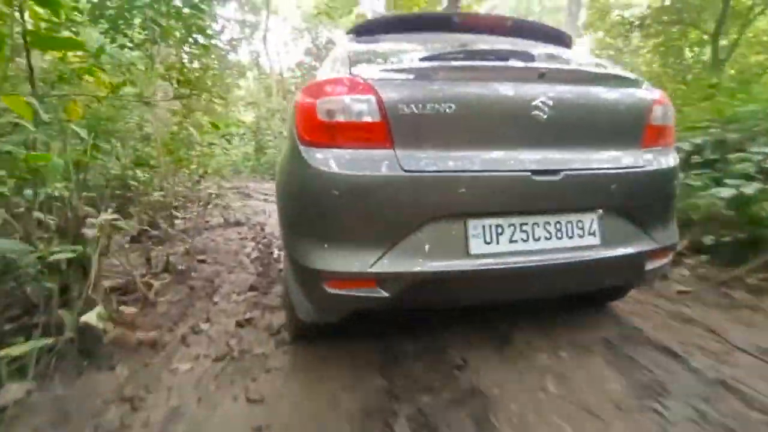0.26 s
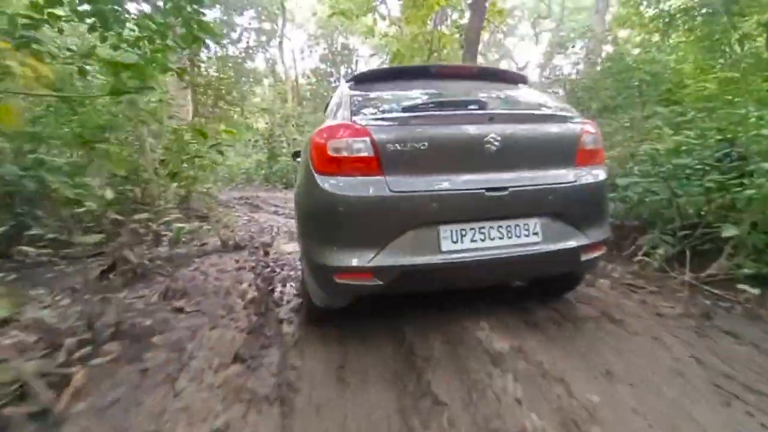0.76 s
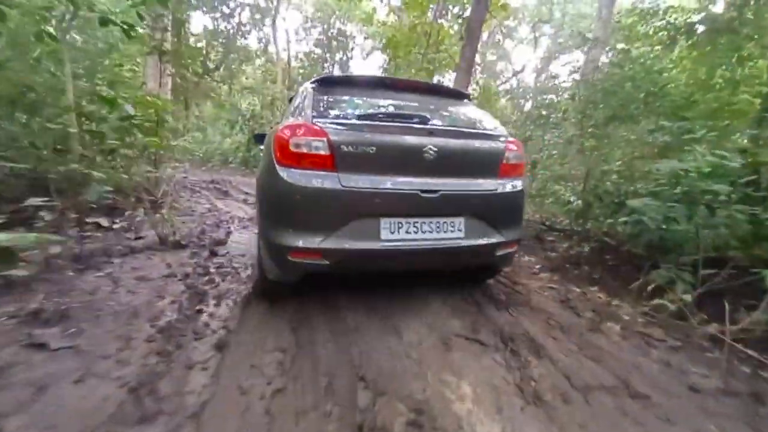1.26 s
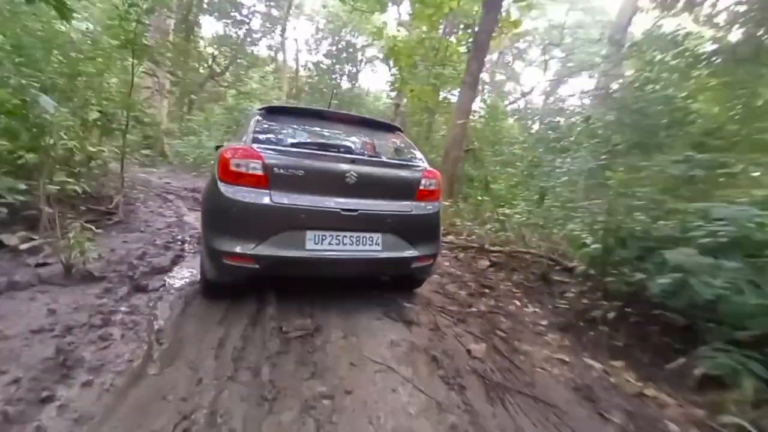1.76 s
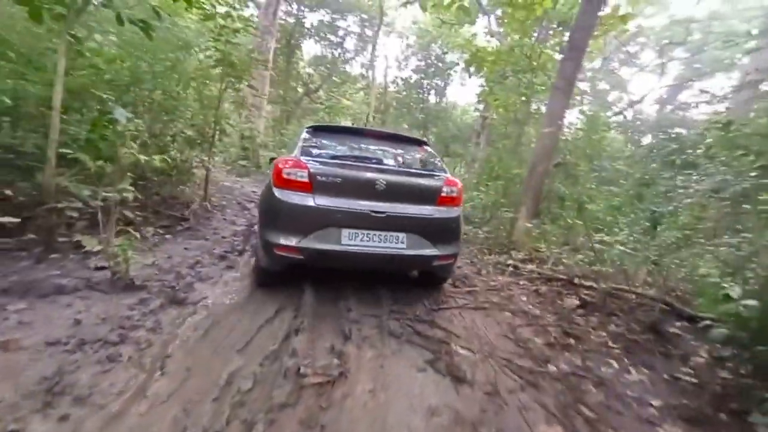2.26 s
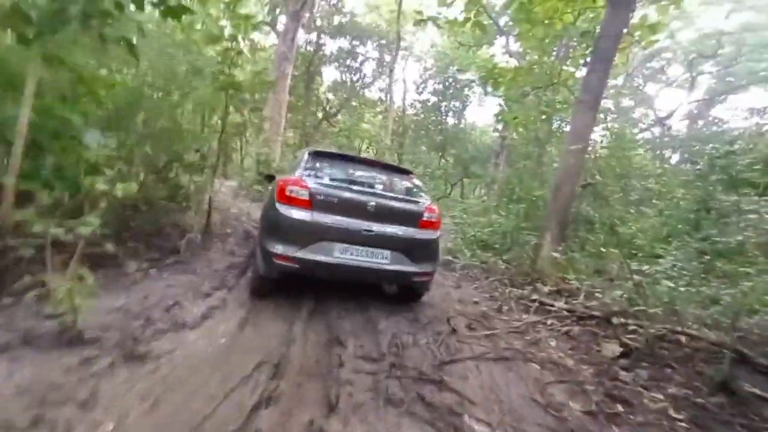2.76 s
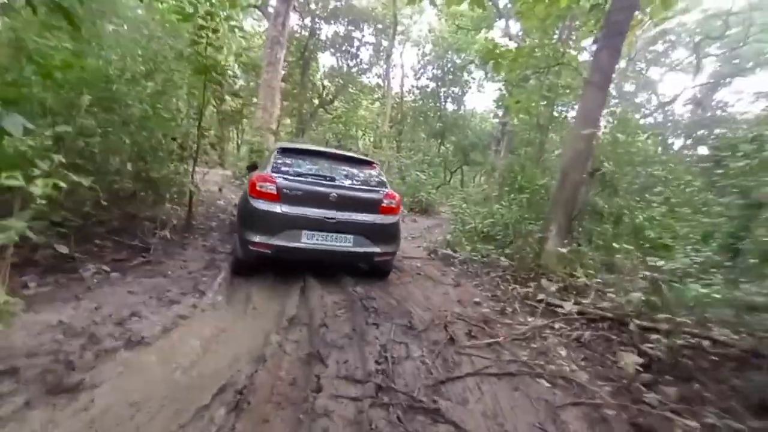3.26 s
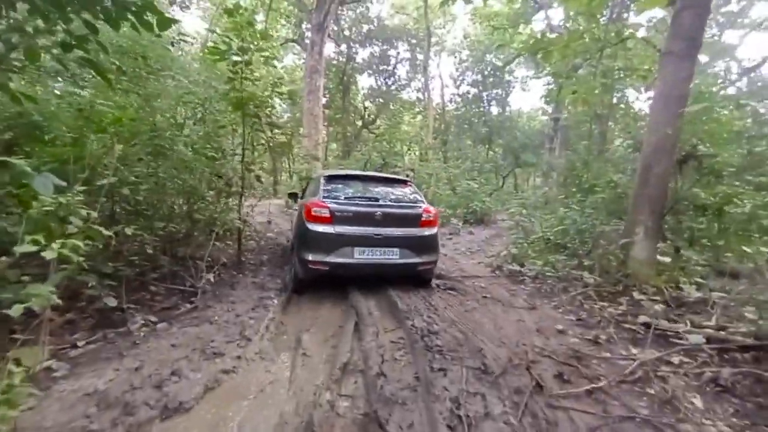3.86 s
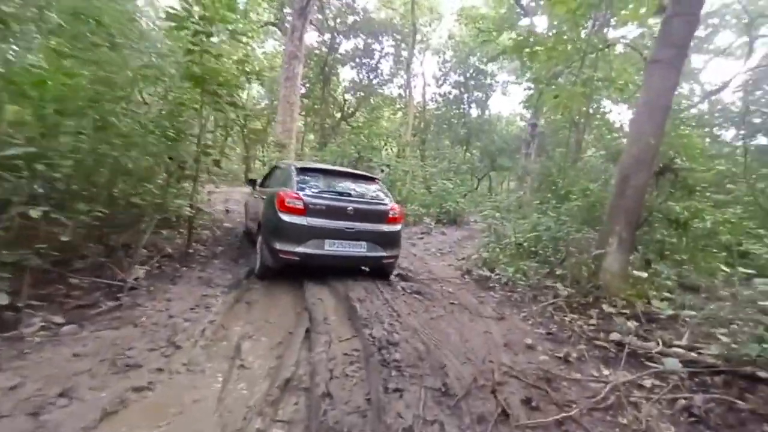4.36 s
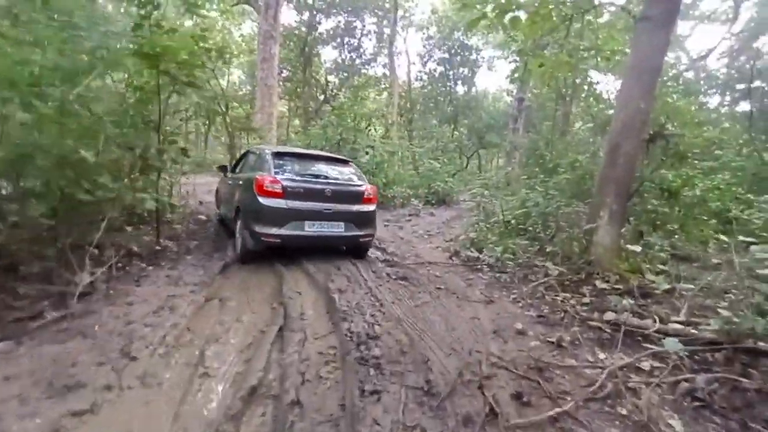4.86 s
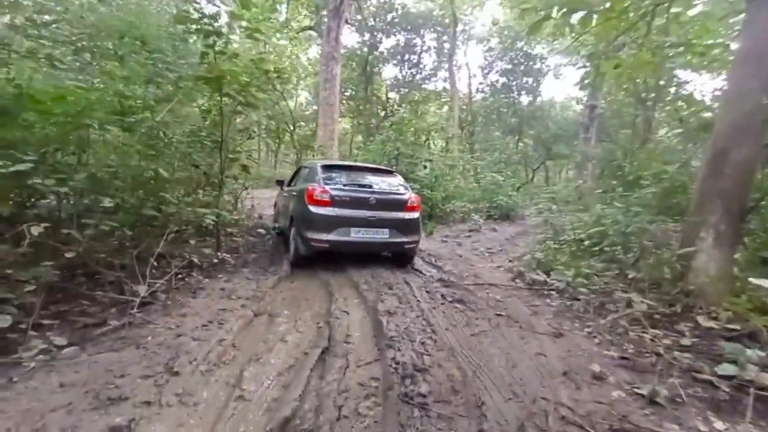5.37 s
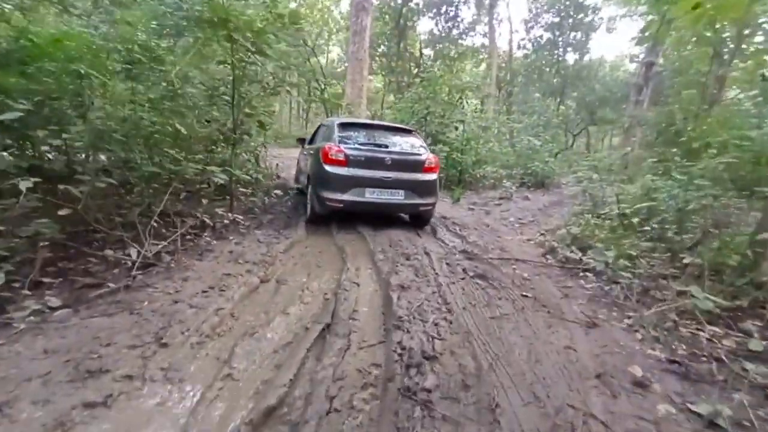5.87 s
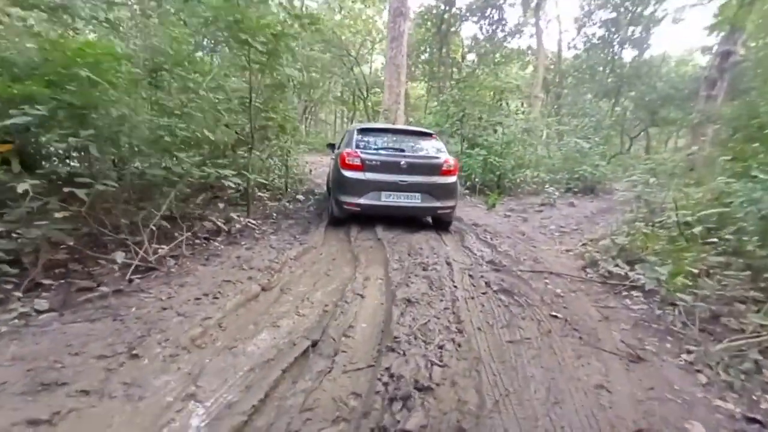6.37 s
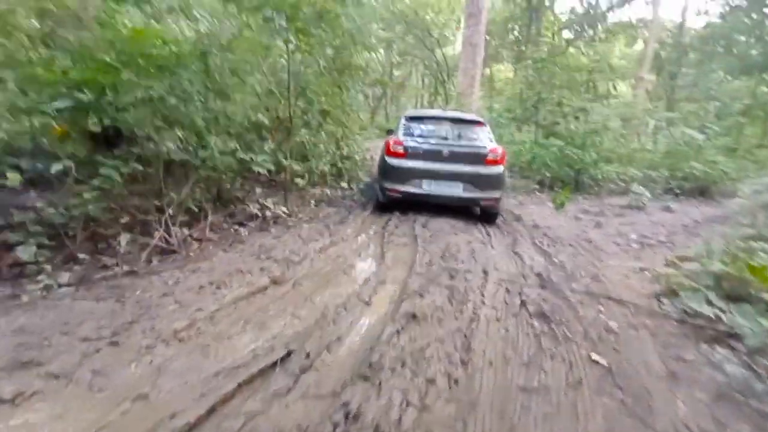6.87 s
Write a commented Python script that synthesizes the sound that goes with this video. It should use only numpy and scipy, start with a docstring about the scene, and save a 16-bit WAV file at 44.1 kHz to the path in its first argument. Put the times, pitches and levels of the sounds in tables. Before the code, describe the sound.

A car works slowly through forest mud. Its low, throaty exhaust is strongest at first with a faint rough whine, then drops back with brief revs around two seconds. Wet tyre crackle, small bubbly squelches, wheel knocks and dry twig snaps run through the scene before a sparse lull. Finally, the revs climb and close branches break and scrape in loud, ringing volleys. The open-air microphone also catches soft background hum and steady high hiss.

```python
"""A muddy forest track: a faint low background and a high hiss lie behind a small car from the first moment.
Its engine, a sum of crank orders and gas puffs through pipe resonances, swells with each push of throttle;
a rough whine comes and goes, and the tyres hiss and crackle through wet mud in clouds of clicks and bubbles.
Twigs ping, wheels knock in ruts, air pockets squelch and sticks crunch in ringing volleys.
Near the end sticks break loudly, as if close by, and scrape; the trees scatter the ground sounds back."""
import sys
import numpy as np
from scipy import signal
from scipy.fft import rfft, irfft
from scipy.io import wavfile
from scipy.ndimage import uniform_filter1d

SR = 44100
rng = np.random.default_rng(int(sys.argv[2]) if len(sys.argv) > 2 else 0)


def unload_audio(sound):
    """Save the sound as a 16-bit wav file, at the path given as the first command line argument."""
    columns = np.transpose(np.atleast_2d(sound))
    # keep every value between -1 and 1, then stretch to whole-number steps
    steps = np.round(np.clip(columns, -1, 1) * 32767)
    wavfile.write(sys.argv[1], SR, steps.astype(np.int16))


N = 313551
T = np.arange(N) / SR

# Spectrum levels are relative: each coloured sound is scaled to rms 1 before its own level is applied.
# faint background, strongest near 200 Hz: frequency_hz, level_db
BACKGROUND_SPECTRUM = [(25, -8), (70, 1.5), (200, 9.5), (350, -11.5), (1000, -3), (3000, -35), (15000, -45)]
# high hiss from the undergrowth: frequency_hz, level_db
HISS_SPECTRUM = [(2000, -18), (3200, -25), (3800, 1.5), (4600, 0.5), (5400, 1.5), (5900, 6), (6400, -2.5),
                 (8200, -3.5), (10000, -9), (15500, -8)]
HISS_DB = -44.5

# crankshaft speed before its small waver: time_s, speed_hz (turns a second)
CRANK_SPEED = [(0, 36.64), (.1, 35.98), (.25, 39.7), (.48, 39.95), (.92, 31.8), (1.1, 32.8), (1.3, 32.83),
               (1.8, 27.37), (2, 31.68), (2.16, 39.73), (2.33, 44.3), (2.47, 38.8), (2.7, 33.3),
               (4.55, 26.96), (4.95, 34.14), (5.55, 32.2), (5.7, 33.65), (5.93, 31.97), (6.05, 34.14),
               (6.17, 40.17), (6.42, 53.2), (6.53, 56.47), (6.74, 56.8), (6.9, 43.56), (7.11, 35.45)]
# pushes on the throttle, levels at CRUISE_HZ: start_s, length_s, note_db (firing note),
# throat_db (throaty pipe sound), third_over_note_db (third crank order), drone_db (clean pipe drone)
THROTTLE_PUSHES = [(0, 0.11, -34.5, -32, -5.5, -37), (0.166, 0.14, -39, -34, 0, -39),
                   (0.294, 0.094, -49, -36, -4, -28), (.42, 0.053, -56, -38.5, -12, -60),
                   (0.6, 0.025, -53, -49, -4, -35), (0.938, 0.2, -47.5, -51, -9, -58),
                   (1.988, 0.14, -38.5, -49, -7.5, -59), (2.137, 0.083, -41, -41.5, -1, -36.5),
                   (2.29, .08, -60, -47.5, -5, -60), (2.458, 0.16, -47.5, -48.5, -5, -46),
                   (4.738, 0.21, -43, -52, -7.5, -57), (5.579, .21, -43, -51.5, -7, -53),
                   (5.838, 0.214, -39, -47, -11, -49), (6.109, 0.1, -42, -49.5, -2.5, -38),
                   (6.35, .14, -44.5, -43.5, -2, -41), (6.53, 0.26, -43, -41, 5, -33.5),
                   (6.798, 0.11, -48, -39, 3.5, -36), (7, .15, -55, -35, 4, -34.5)]
# exhaust pipe resonances: pitch_hz, width_hz, level_db (at zero load_db and CRUISE_HZ),
# bite_db_per_db (gain for each dB of load), rev_db_per_octave (gain with engine speed)
PIPE_RESONANCES = [(176, 9.5, -6.5, 0, -3), (201.4, 15.4, -5, 0, 0.5), (253.3, 11.6, -13.5, 0.53, 21.5),
                   (428.2, 36, -0.5, 0.43, -10.5), (575, 110, -23, -0.4, -11)]
# spectrum of the shaking car body: frequency_hz, level_db
BODY_RUMBLE = [(40, -12), (90, -4), (140, -7), (175, -1), (240, -19), (300, -21), (600, -30), (2000, -62)]
CRUISE_HZ = 35  # crank speed at which the speed-dependent gains are zero
IDLE_NOTE_DB, IDLE_THROAT_DB, IDLE_DRONE_DB = -73, -61, -60.5  # floors between pushes
REV_RISE_DB_PER_S, NOTE_FALL_DB_PER_S, THROAT_FALL_DB_PER_S = 137, 108, 167
NOTE_DB_PER_OCTAVE, THROAT_DB_PER_OCTAVE = 5, 17.5  # gain with engine speed
BOOM_HZ, BOOM_WIDTH_HZ, BOOM_DB = 112.6, 31, 7.5  # silencer lift on the second and third orders
DRONE_HZ, DRONE_WIDTH_HZ, DRONE_SWELL_DB_PER_S = 201.5, 41, 328
GAS_SHARE = .3  # gas puffs relative to the firing pulses
RUMBLE_DB = -10  # relative to the throaty sound

# faint rough whine that comes and goes: start_s, length_s, level_db
WHINE_SPELLS = [(0, 0.61, -46), (5.18, 0.09, -56.5), (6.2, 0.16, -58)]
WHINE_HZ, WHINE_FADE_DB_PER_S = 1274, 160

# how hard the tyres work the mud: time_s, churn_db (reference for the crackle, spray and random bursts)
TYRE_CHURN = [(0, -37.5), (.55, -37.5), (.68, -41), (.83, -39.5), (.91, -33), (1.1, -36), (1.22, -36),
              (1.3, -31.5), (1.41, -37), (1.56, -40.5), (1.85, -42.5), (1.97, -39), (2.25, -39),
              (2.5, -36.5), (2.66, -34), (2.86, -41), (3.08, -38), (3.3, -39), (3.8, -43.5), (4.15, -37),
              (4.45, -46), (4.6, -40.5), (4.87, -43), (4.97, -47.5), (5.18, -51.5), (5.26, -58),
              (5.38, -51), (5.45, -63), (5.8, -56), (5.88, -55), (6.08, -60.5), (6.38, -55), (6.5, -36.5),
              (6.65, -40), (6.75, -40), (6.88, -43), (6.97, -32), (7.11, -34)]
# a tyre wades through a wet patch: start_s, length_s, slosh_db
WET_PATCHES = [(0, 0.85, -43), (.89, 0.52, -35.5), (2.02, 0.54, -45.5), (2.48, 0.35, -35),
               (2.85, 0.46, -41.5), (3.75, 0.23, -43.5), (4.04, 0.29, -37.5), (4.55, 0.32, -44),
               (6.46, 0.11, -32.5), (6.7, 0.19, -33), (7.01, 0.056, -27.5)]
# watery slosh: frequency_hz, level_db
SLOSH_SPECTRUM = [(150, -42), (350, -21), (600, -3), (850, -14), (1150, 9), (1700, 11), (2300, 6.5),
                  (3500, 2)]
# sticky crackle: frequency_hz, level_db
CRACKLE_SPECTRUM = [(900, -13.5), (1800, -6), (2500, 3), (3200, 4.5), (3900, 6), (4500, 4.5), (5200, -17.5),
                    (7000, -5), (10000, -11.5)]
# fine spray: frequency_hz, level_db
SPRAY_SPECTRUM = [(2200, -57), (3200, -14), (4000, -8), (5200, 4), (5900, 5), (6500, -2), (8000, 0.5),
                  (10000, -9), (15500, -5.5)]
CRACKLE_DB, SPRAY_DB, DAMP_SLOSH_DB = 3, -1.5, -9.5  # relative to the churn
SLOSH_RISE_DB_PER_S, SLOSH_FALL_DB_PER_S = 446, 137

# loudest twigs snapping: start_s, ping_db, pitch_hz, tick_db (bright tick relative to the ping)
LOUD_SNAPS = [(.0662, -18, 2740, -14), (0.562, -10.5, 2270, -10), (0.722, -17, 3800, -4),
              (1.013, -14, 3430, 0), (1.0412, -27, 3700, -12), (1.228, -19.5, 2290, -12),
              (1.246, -9.5, 3500, -0.5), (1.336, -12, 5470, -18), (1.414, -15.5, 4600, -12),
              (1.4276, -16.5, 3620, -3), (1.5928, -19, 4130, -14), (1.601, -15, 3530, -8),
              (1.6815, -14, 3700, -4), (1.6862, -11.5, 2860, -5), (1.6946, -12, 3870, -7),
              (1.8143, -14.5, 3730, -17), (1.8784, -16.5, 2800, -2), (1.8858, -9.5, 4300, -7),
              (1.937, -18, 4320, 0), (1.9674, -19, 4204, -5), (2.017, -15.5, 3460, -0.5),
              (2.0742, -12.5, 4050, -10), (2.1208, -17, 4180, -6), (2.282, -20, 3840, -14),
              (2.326, -16.5, 3870, -4), (2.4037, -19.5, 2710, -17), (2.5318, -16, 3430, -15),
              (2.6023, -12.5, 5370, -17), (2.876, -17.5, 3540, -12), (2.9465, -19, 3700, -5),
              (2.97, -16.5, 3490, -12), (3.19, -16, 4300, -19), (3.206, -18, 3710, -21),
              (3.314, -19.5, 2350, -16), (3.3784, -17, 3970, -7), (3.391, -12.5, 4300, -12),
              (3.4061, -13.5, 4030, -18), (3.505, -24, 4610, 9), (3.511, -19, 5700, -2),
              (3.6068, -13.5, 3900, -5), (3.7997, -17, 3415, -10), (4.727, -8.5, 2340, -12),
              (4.8156, -22, 6490, -2), (4.8233, -13.5, 3850, -22), (4.9111, -21, 3160, 1),
              (4.949, -21, 3850, -1), (5.071, -24.5, 6600, 7), (5.149, -20, 1805, -9),
              (5.3008, -16, 4114, -12), (5.376, -23, 2829, -8), (6.3175, -22, 4800, -2),
              (6.356, -16, 4340, -10), (6.7333, -17.5, 3950, -18), (6.7578, -8.5, 6967, -14),
              (6.8313, -9.5, 5300, 4), (6.8365, -2.5, 4460, -11)]
SNAP_CYCLES = 1.76  # fade time constant, in cycles of the twig's pitch
# small twigs break at random
TWIGS_PER_S, TWIG_OVER_CHURN_DB, TWIG_SPREAD_DB = 8.9, 15, 9.5
TWIG_HZ, TWIG_SPREAD_OCTAVES, TWIG_TICK_DB = 3980, 0.6, -29

# wheels dropping into ruts: start_s, level_db, pitch_hz, fade_ms (time constant), sag (octaves a second)
RUT_THUMPS = [(.195, -28, 187, 17, 1), (.415, -30, 188, 22, 6.4), (.825, -42, 143, 19, 1.8),
              (2.25, -34.5, 175.3, 32, 4), (2.385, -37, 46, 50, 1), (2.44, -34.5, 83.9, 28, 1.04),
              (2.515, -36, 74, 29, 2), (2.54, -37, 42, 45, 1), (2.605, -39, 444, 24, 1),
              (2.595, -38, 115.7, 23, 1), (2.6, -32.5, 206, 24, 1), (3.74, -30, 185, 24, 12.5),
              (4.003, -29.5, 204, 29, 2), (4.285, -39.5, 131, 14, 2), (4.742, -32.5, 125.4, 40, 0.95),
              (4.8655, -12, 820, 1.66, 2.4), (4.8656, -18.5, 394, 2.6, 2), (5.625, -34, 140.5, 67, 8.1),
              (5.81, -39.5, 141, 62, 2), (6.764, -20.5, 149, 17, 2), (6.8, -28, 85.5, 66, 8),
              (6.869, -28, 127.7, 27, 1), (6.92, -23.5, 250, 26, 1.2), (7.007, -26, 107, 32, 1.02)]

# mud squelching under a tyre: start_s, level_db, pitch_hz (air pocket), fade_ms (time constant)
LOUD_SQUELCHES = [(0.558, -20.5, 1600, 7.2), (1.09, -46.5, 623, 81), (.863, -30.5, 1324, 37),
                  (1.066, -34, 1270, 22), (.95, -37, 575, 12), (1.203, -34, 1013, 31),
                  (1.265, -30, 1165, 22), (1.317, -27.5, 604, 13), (1.323, -23, 985, 15),
                  (1.384, -31, 1116, 10), (1.499, -36, 1170, 21), (2.28, -43.5, 580, 60),
                  (2.452, -32.5, 1130, 13), (2.48, -41.5, 603, 55), (2.507, -29, 1017, 19),
                  (2.599, -37.5, 525, 48), (2.636, -32.5, 1010, 24), (2.709, -36, 518, 60),
                  (2.785, -31, 1002, 20), (2.948, -35.5, 1240, 20.4), (3.118, -44, 592, 24),
                  (3.234, -37.5, 1070, 25), (3.29, -38, 1180, 40), (3.727, -33, 515, 15),
                  (3.843, -38.5, 815, 14), (3.996, -28, 550, 16), (3.999, -25.5, 1078, 27),
                  (4.095, -29, 1128, 14), (4.162, -44, 513, 18), (4.285, -30.5, 1203, 22),
                  (4.29, -38.5, 660, 25), (4.344, -41.5, 570, 58), (4.472, -32, 735, 21),
                  (4.611, -25, 608, 25), (4.635, -30, 632, 22), (4.783, -37, 740, 23),
                  (5.235, -50, 655, 37), (5.499, -39.5, 694, 20.7), (5.764, -38.5, 955, 37.5),
                  (5.767, -43.5, 1321, 34), (6.424, -20, 1250, 21), (6.57, -32, 1115, 50),
                  (6.685, -16, 969, 9.2), (6.775, -14.5, 590, 14), (6.927, -24, 895, 6.2),
                  (7.076, -20, 1115, 31)]
OVERTONE_EVEN_HZ, OVERTONE_DB_PER_OCTAVE = 500, -12.5  # a 500 Hz pocket rings note and overtone equally
# small air pockets burst at random
POCKETS_PER_S, POCKET_OVER_CHURN_DB, POCKET_SPREAD_DB = 8, -10, 3
POCKET_HZ, POCKET_SPREAD_OCTAVES, POCKET_FADE_MS = 952, .5, 18

# sticks and clods crunching: start_s, body_db (woody body), body_pitch (ratio to WOOD_MODES), splinter_db,
# splinter_pitch (ratio to SPLINTER_SPECTRUM), chip_db (fine chips), rise_ms, fade_ms (time constant)
STICK_CRUNCHES = [(0.562, -47, 1.16, -22.5, 0.825, -24.5, 2.3, 8), (3.4, -46, 1.2, -27.5, 1, -52, 6.8, 27),
                  (3.722, -33.5, 0.94, -37, 0.52, -48, 4, 26),
                  (4.282, -35.5, 0.96, -32, 0.61, -34.5, 4.8, 21),
                  (4.535, -35, 1.08, -28.5, 0.94, -40, 3.3, 18),
                  (4.872, -30, 1.02, -50, 0.99, -48, 3.5, 23), (6.422, -21, 1.1, -31, 0.79, -22.5, 3, 27),
                  (6.472, -38, 1.03, -32, 1.06, -31, 5.2, 11),
                  (6.503, -24.5, 1.03, -21.5, 1.02, -24.5, 3.5, 15),
                  (6.553, -26, 1.02, -26, 0.82, -28.5, 2.1, 11),
                  (6.685, -16, 0.97, -41, 0.82, -26, 4.1, 12.1), (6.759, -16, 0.88, -42, 0.74, -40, 4, 13),
                  (6.771, -10, 1, -16.5, 0.66, -9, 4.1, 7.9), (6.887, -26, 0.81, -38, 0.93, -27, 2.2, 12.7),
                  (6.9245, -15.5, 0.83, -4.5, 1, -20, 2.1, 4.8),
                  (6.9305, -17.5, 1.02, -9.5, 1.03, -20, 1.8, 8.7),
                  (7.008, -23.5, 0.95, -29, .8, -31, 4.5, 12),
                  (7.06, -33, 1.24, -18.5, 0.86, -17, 1.1, 12.5),
                  (7.075, -17.5, 0.94, -11.5, 0.79, -25, 1.7, 11)]
# resonances of struck wood: pitch_hz, width_hz, level_db
WOOD_MODES = [(580, 90, -2.5), (970, 74, -1.5), (1097, 110, -1), (1296, 85, 0.5), (1460, 450, -1.5),
              (1960, 1300, -1.5)]
# flying splinters: frequency_hz, level_db
SPLINTER_SPECTRUM = [(800, -28), (1500, -5), (2100, -6.5), (2800, 8.5), (3400, 8), (4050, 12.5), (4600, 1),
                     (5200, -7), (6100, 4.5), (7000, -8), (8000, -18), (10000, -10)]
# fine chips: frequency_hz, level_db
CHIP_SPECTRUM = [(2200, -26), (3200, -17), (4000, 5.5), (4900, -4.5), (5900, 5), (7400, 2), (8600, -2),
                 (10000, -5), (15500, -8)]
STICK_TONE_DB = 2.5  # random spread of each stick's own tone

# sticks scraping along the underbody: start_s, length_s, level_db, pitch_hz,
# upper_db and body_db (upper mode and woody body, relative to the level)
STICK_SCRAPES = [(6.47, .11, -44, 4054, -1, 1), (6.79, 0.11, -32, 3450, 1.5, 1),
                 (6.947, 0.0675, -33, 3670, -14, 0), (7.015, 0.1, -33, 3420, -18, -2)]
SLIPS_PER_S, SCRAPE_WIDTH_HZ, UPPER_MODE_RATIO, SCRAPE_FADE_DB_PER_S = 3200, 770, 1.685, 1500
SCRAPE_GRIT_DB = -2  # splinters torn off by each slip, relative to the level

# microphone colour: frequency_hz, level_db
MIC_RESPONSE = [(20, -48), (40, -4.5), (60, -4.5), (7000, -2.5), (8400, -3), (9200, -12), (10500, -9.5),
                (11500, -12.5), (12700, -5), (16000, -6.5)]
EDGE_HZ = 15950  # upper band limit


def amp(db):
    """Decibels to gain."""
    return 10 ** (np.asarray(db) / 20)


def unit(x):
    """Scales to rms 1."""
    return x / np.sqrt(np.mean(x ** 2) + 1e-20)


def noise(size=N):
    """White noise."""
    return rng.standard_normal(size)


def curves(rows):
    """Each column of a timed table, one value a sample."""
    s, *columns = np.transpose(rows)
    return [np.interp(T, s, c) for c in columns]


def add(mix, s, sound):
    """Mixes a sound in at time s."""
    part = mix[max(round(s * SR), 0):][:len(sound)]
    part += sound[:len(part)]


def colour(x, points):
    """Filters by a spectrum of (Hz, dB) points."""
    f, db = np.transpose(points)
    hz = np.fft.rfftfreq(len(x), 1 / SR)
    gain = amp(np.interp(np.log(hz + 1), np.log(f), db))
    return irfft(rfft(x) * gain, len(x))


def ring(x, hz, width_hz):
    """One resonance of gain 1."""
    q = hz / min(width_hz, SR / 4)
    return signal.lfilter(*signal.iirpeak(min(hz, SR / 3), q, SR), x)


def ring_twice(x, hz, width_hz, second_width_hz):
    """Two resonances in series at one pitch, for steeper skirts."""
    return ring(ring(x, hz, width_hz), hz, second_width_hz)


def drift(rate_hz):
    """Smooth chance of rms 1, up to about this rate."""
    hz = np.fft.rfftfreq(N, 1 / SR)
    return unit(irfft(rfft(noise()) * np.exp(-(hz / rate_hz) ** 2), N))


def clicks(per_s, spread_db, size=N):
    """Clicks at random times, of random sign, with levels spread exponentially in dB."""
    chance = rng.random(size)
    sign = rng.choice([-1, 1], size)
    height = np.minimum(rng.exponential(1, size), 4)
    return (chance < per_s / SR) * sign * amp(spread_db * height)


def burst(t, rise_ms, fade_ms):
    """Envelope that rises to 1 and dies away."""
    ms = t * 1000
    shape = (1 - np.exp(-(ms / rise_ms) ** 2)) * np.exp(-ms / fade_ms)
    return shape / shape.max()


def swells(rows, rise_db_per_s, fall_db_per_s):
    """Level in dB of (start, length, dB) events that rise, hold and fall away; the loudest wins."""
    levels = []
    for s, length, db in rows:
        before_db = rise_db_per_s * np.maximum(s - T, 0)
        after_db = fall_db_per_s * np.maximum(T - s - length, 0)
        levels.append(db - before_db - after_db)
    return np.max(levels, axis=0)


def scattered(per_s, over_churn_db, spread_db, hz, spread_octaves):
    """Random (s, dB, Hz) events whose strength follows the churn."""
    times, sizes, pitches = rng.random((round(per_s * N / SR), 3)).T
    s = times * N / SR
    churn_db = np.interp(s, *np.transpose(TYRE_CHURN))
    db = churn_db + over_churn_db + spread_db * (2 * sizes - 1)
    return list(zip(s, db, hz * 2 ** (spread_octaves * (2 * pitches - 1))))


def background():
    """Steady coloured noise gives a faint background with a soft low hum near 200 Hz."""
    return amp(-58.5) * unit(colour(noise(), BACKGROUND_SPECTRUM))


def undergrowth_hiss():
    """Dense uneven clicks merge into a high hiss that wavers slightly."""
    grains = clicks(per_s=7000, spread_db=4.5)
    return amp(HISS_DB + 0.99 * drift(14.0)) * unit(colour(grains, HISS_SPECTRUM))


def engine():
    """Low crank orders hum; higher orders and gas puffs glide through the exhaust pipe's resonances."""
    speed_hz = curves(CRANK_SPEED)[0] * (1 + 0.004 * drift(12.0))
    octaves = np.log2(speed_hz / CRUISE_HZ)
    turns = np.cumsum(speed_hz) / SR
    start, length, note, throat, third, drone = np.transpose(THROTTLE_PUSHES)

    def push(db, fall, rise=REV_RISE_DB_PER_S):
        return swells(zip(start, length, db), rise, fall)

    def order(k, waver):
        tone = np.sqrt(2) * np.sin(2 * np.pi * (k * turns + rng.random()))
        return tone * (1 + waver * drift(17))

    def near(k, hz, width_hz):
        return 1 / (1 + (2 * (k * speed_hz - hz) / width_hz) ** 2)

    def boom(k):
        return amp(BOOM_DB * near(k, BOOM_HZ, BOOM_WIDTH_HZ))

    def pipe(x, hz, width_hz):
        return unit(ring_twice(x, hz, width_hz, 1.76 * width_hz))

    note_db = push(note, NOTE_FALL_DB_PER_S) + NOTE_DB_PER_OCTAVE * octaves
    note_db = np.maximum(note_db, IDLE_NOTE_DB)
    third_db = push(note + third, THROAT_FALL_DB_PER_S) + NOTE_DB_PER_OCTAVE * octaves
    throat_db = push(throat, THROAT_FALL_DB_PER_S) + THROAT_DB_PER_OCTAVE * octaves
    throat_db = np.maximum(throat_db, IDLE_THROAT_DB)
    drone_db = push(drone, DRONE_SWELL_DB_PER_S, DRONE_SWELL_DB_PER_S)
    drone_db = np.maximum(drone_db, IDLE_DRONE_DB)

    radiated = 1 / np.sqrt(1 + (50 / speed_hz) ** 8)  # the first order only carries at high revs
    low_orders = amp(1.5) * radiated * order(1, .1) + boom(2) * order(2, .15)
    hum = amp(note_db) * low_orders + amp(third_db) * boom(3) * order(3, .18)
    # the pipe sings with whichever order crosses its main resonance
    song = sum(order(k, .22) * near(k, DRONE_HZ, DRONE_WIDTH_HZ) for k in range(4, 8))

    # uneven cylinders add weak half orders
    firing = unit(sum(order(k, .22) + .3 * order(k + .5, .5) for k in range(4, 18)))
    puffs = noise() * (1 + 0.73 * np.cos(4 * np.pi * turns))  # two puffs a turn
    load_db = throat_db + 25.0
    growl = np.zeros(N)
    for hz, width_hz, db, bite, rev in PIPE_RESONANCES:
        # load and engine speed raise or lower each resonance by its own amount
        level_db = db + bite * load_db + rev * octaves + 2 * drift(18.0)
        growl += amp(level_db) * (pipe(firing, hz, width_hz) + GAS_SHARE * pipe(puffs, hz, width_hz))
    rumble = amp(RUMBLE_DB + 6.2 * drift(9.5)) * unit(colour(puffs, BODY_RUMBLE))
    return hum + amp(drone_db) * song + amp(throat_db) * (amp(-2) * growl + rumble)


def whine():
    """Noise through a narrow resonance gives a fuzzy whine from the car."""
    level_db = swells(WHINE_SPELLS, WHINE_FADE_DB_PER_S, WHINE_FADE_DB_PER_S)
    return amp(level_db) * unit(ring_twice(noise(), WHINE_HZ, 55, 95))


def bubbles(per_s, spread_db, cycles, glide, count=24):
    """Small air pockets in the slurry, each ringing briefly at a nearly steady pitch."""
    out = np.zeros(N)
    t = np.arange(2048) / SR
    for hz in np.geomspace(450, 2600, count):
        age = t * hz / cycles
        bubble = age * np.exp(-age) * np.sin(2 * np.pi * hz * t * (1 + glide * age))
        out += signal.oaconvolve(clicks(per_s / count, spread_db), bubble)[:N]
    return unit(out)


def flicker(x, patchy_db, top_hz, order=5):
    """Tone colour of the tyre noise flickers at random in narrow patches, chiefly below top_hz."""
    hz, _, z = signal.stft(x, SR, nperseg=1024, noverlap=768)
    field = rng.standard_normal(z.shape)
    for _ in range(2):  # smooth over frequency, then over time
        field = uniform_filter1d(field, size=3, axis=0)
        field = uniform_filter1d(field, size=2 * order + 1, axis=1)
    depth_db = patchy_db / (1 + (hz[:, None] / top_hz) ** 3)
    gain = amp(depth_db * np.clip(unit(field), -2, 2))
    gain /= np.sqrt(np.mean(gain ** 2, axis=1, keepdims=True))
    return signal.istft(z * gain, nperseg=1024, noverlap=768)[1][:N]


def tyres():
    """Tread presses water out of the mud and tears free of it in clumps of tiny pops."""
    churn_db = curves(TYRE_CHURN)[0] + 1.0 * drift(2.44)
    wading_db = swells(WET_PATCHES, SLOSH_RISE_DB_PER_S, SLOSH_FALL_DB_PER_S)
    slosh_db = np.maximum(wading_db, churn_db + DAMP_SLOSH_DB) + 1.8 * drift(27)
    crackle_db = churn_db + CRACKLE_DB + 1.93 * drift(60)
    spray_db = churn_db + SPRAY_DB + 2.1 * drift(56)

    pops = unit(clicks(per_s=1100, spread_db=3.0))  # shared by crackle and spray
    sticky_pops = pops + unit(clicks(per_s=6000, spread_db=-1.0))
    fine_pops = 0.84 * pops + unit(clicks(per_s=5900, spread_db=-1.0))
    froth = bubbles(per_s=2600, spread_db=2, cycles=2.5, glide=.004)

    mud = amp(slosh_db) * unit(colour(froth + 1.04 * noise(), SLOSH_SPECTRUM))
    mud += amp(crackle_db) * unit(colour(sticky_pops, CRACKLE_SPECTRUM))
    mud += amp(spray_db) * unit(colour(fine_pops, SPRAY_SPECTRUM))
    return flicker(amp(.8 * drift(45)) * mud, patchy_db=3.8, top_hz=2900)


def snap(hz, tick_db):
    """A fracture starts with a bright tick, rings for a few cycles and leaves a wisp of falling grit."""
    t = np.arange(2048) / SR
    ring_ms = 1000 * SNAP_CYCLES / hz
    ping = burst(t, .25, ring_ms) * np.sin(2 * np.pi * hz * t)
    tick = unit(colour(noise(len(t)), [(2000, -25), (6000, 6), (15000, -2)])) * burst(t, .09, .4)
    grit = unit(ring_twice(noise(len(t)), hz, 0.73 * hz, 2 * hz)) * burst(t, 0.12, 5.5)
    return ping + amp(tick_db) * tick + amp(-14.0) * grit


def snaps():
    """Twigs break under the tyres: listed loud ones, and others at random."""
    out = np.zeros(N)
    for s, db, hz, tick_db in LOUD_SNAPS:
        add(out, s, amp(db) * snap(hz, tick_db))
    for s, db, hz in scattered(TWIGS_PER_S, TWIG_OVER_CHURN_DB, TWIG_SPREAD_DB,
                               TWIG_HZ, TWIG_SPREAD_OCTAVES):
        add(out, s, amp(db) * snap(hz, TWIG_TICK_DB))
    return out


def thumps():
    """Short, heavily damped booms of tyre and suspension, sagging in pitch as the load lets go."""
    out = np.zeros(N)
    t = np.arange(SR // 2) / SR
    for s, db, hz, fade_ms, sag in RUT_THUMPS:
        rumble = unit(ring_twice(noise(len(t)), hz, .5 * hz, 0.81 * hz))
        boom = np.sin(2 * np.pi * np.cumsum(hz * 2 ** (-sag * t)) / SR)
        add(out, s, amp(db) * (boom + .45 * rumble) * burst(t, .3 * fade_ms, fade_ms))
    return out


def squelch(hz, fade_ms, overtone_ratio=1.826, glide=0.312):
    """Trapped air bursts out of the mud through a pocket with two nearly steady resonances."""
    t = np.arange(SR // 4) / SR
    froth = clicks(per_s=4300, spread_db=-1.0, size=len(t))
    upper_hz = overtone_ratio * hz
    overtone_db = OVERTONE_DB_PER_OCTAVE * np.log2(hz / OVERTONE_EVEN_HZ)
    puff = burst(t, 2.2, fade_ms)
    pocket = unit(puff * ring_twice(froth, hz, 0.05 * hz, 0.5 * hz))
    overtone = unit(puff * ring_twice(froth, upper_hz, 0.32 * upper_hz, 0.33 * upper_hz))
    # the pitch drifts very slightly
    read_s = t * (1 + glide * (t - fade_ms / 1000))
    wet = np.interp(read_s, t, pocket + amp(overtone_db) * overtone)
    return np.sqrt(np.mean(puff ** 2)) * wet


def squelches():
    """Air pockets give way under the tyres: listed ones, and small ones at random."""
    out = np.zeros(N)
    for s, db, hz, fade_ms in LOUD_SQUELCHES:
        add(out, s - .002, amp(db) * squelch(hz, fade_ms))  # 2 ms early, for the puff to rise
    for s, db, hz in scattered(POCKETS_PER_S, POCKET_OVER_CHURN_DB, POCKET_SPREAD_DB,
                               POCKET_HZ, POCKET_SPREAD_OCTAVES):
        add(out, s, amp(db) * squelch(hz, POCKET_FADE_MS))
    return out


def wood(x, pitch=1):
    """Rings a piece of wood; smaller pieces ring higher."""
    modes = [amp(db) * unit(ring_twice(x, pitch * hz, w, 6 * w)) for hz, w, db in WOOD_MODES]
    return unit(sum(modes))


def crunches():
    """Fibres give way in a fast, ragged volley that rings the wood and throws off splinters."""
    out = np.zeros(N)
    t = np.arange(SR // 4) / SR
    tones_hz = np.arange(1500, 16000, 170)
    for s, body_db, body_pitch, splinter_db, splinter_pitch, chip_db, rise_ms, fade_ms in STICK_CRUNCHES:
        fibres = clicks(per_s=6400, spread_db=4.0, size=len(t))
        volley = burst(t, rise_ms, fade_ms)
        body = wood(fibres * volley, body_pitch) * np.sqrt(np.mean(volley ** 2))
        # every stick favours its own pitches
        stick = colour(fibres, np.c_[tones_hz, STICK_TONE_DB * noise(len(tones_hz))])
        splinter_points = [(splinter_pitch * hz, db) for hz, db in SPLINTER_SPECTRUM]
        splinters = amp(splinter_db) * unit(colour(stick, splinter_points))
        chips = amp(chip_db) * unit(colour(stick, CHIP_SPECTRUM))
        add(out, s, amp(body_db) * body + (splinters + chips) * volley)
    return out


def scrapes():
    """A dragged stick catches and slips in uneven spurts, ringing two modes and the woody body."""
    out = np.zeros(N)
    for s, length, db, hz, upper_db, body_db in STICK_SCRAPES:
        slips = clicks(SLIPS_PER_S, spread_db=1.5) * amp(1.5 * drift(110))

        def mode(f):
            return unit(ring_twice(slips, f, SCRAPE_WIDTH_HZ, SCRAPE_WIDTH_HZ))

        stroke = amp(swells([(s, length, db)], SCRAPE_FADE_DB_PER_S, SCRAPE_FADE_DB_PER_S))
        stick = mode(hz) + amp(upper_db) * mode(UPPER_MODE_RATIO * hz)
        body = amp(body_db) * wood(slips)
        grit = amp(SCRAPE_GRIT_DB) * unit(colour(slips, SPLINTER_SPECTRUM))
        out += stroke * (stick + body + grit)
    return out


def forest(x, t60=0.16, wet_db=-13):
    """Trunks and leaves scatter back a thin, short tail."""
    t = np.arange(SR // 2) / SR
    echoes = clicks(per_s=2800, spread_db=0.5, size=len(t))
    taps = colour(echoes, [(100, 23), (900, 8.5), (3800, 7.0), (6000, 5.0), (15000, 2)])
    tail = taps * np.exp(-np.log(1000) * t / t60) * (1 - np.exp(-t / 0.00072))
    return x + amp(wet_db) * signal.fftconvolve(x, tail / np.linalg.norm(tail))[:N]


def scene():
    """Car, mud and sticks among the trees."""
    place = background() + undergrowth_hiss()
    car = engine() + whine() + tyres() + thumps()
    ground = forest(snaps(), wet_db=-12.5) + forest(squelches() + crunches() + scrapes())
    return (place + car + ground)[None]


def record(dry):
    """Microphone colour, overload at full scale and the band limit."""
    heard = np.clip(colour(dry[0], MIC_RESPONSE), -1, 1)
    band = signal.firwin(511, EDGE_HZ, window=("kaiser", 9), fs=SR)
    return signal.oaconvolve(heard, band, "same")[None]


dry = scene()
out = record(dry)
unload_audio(out)
```